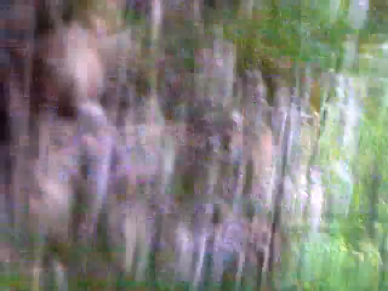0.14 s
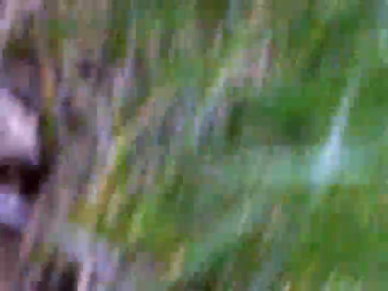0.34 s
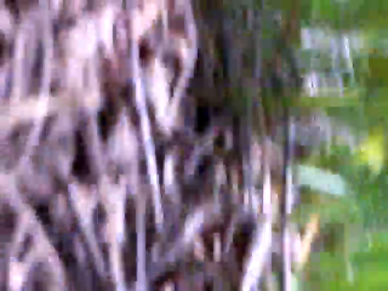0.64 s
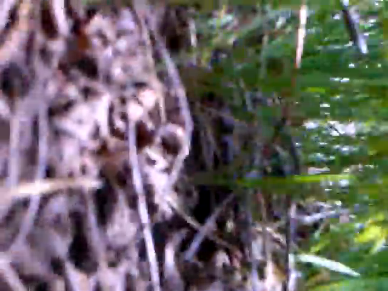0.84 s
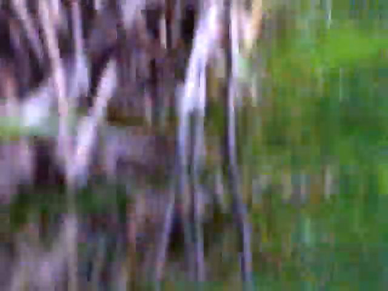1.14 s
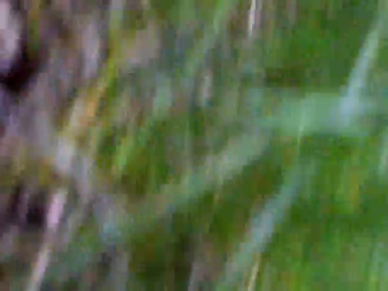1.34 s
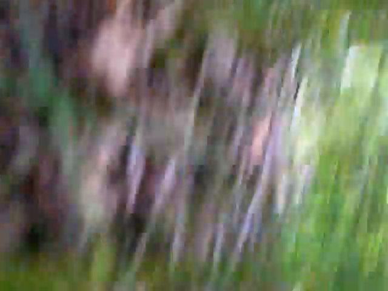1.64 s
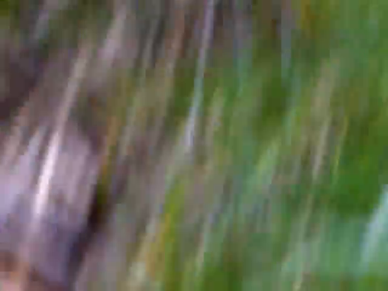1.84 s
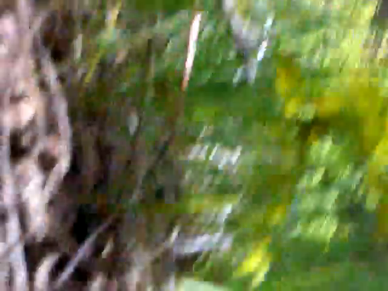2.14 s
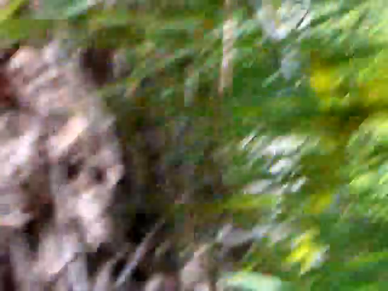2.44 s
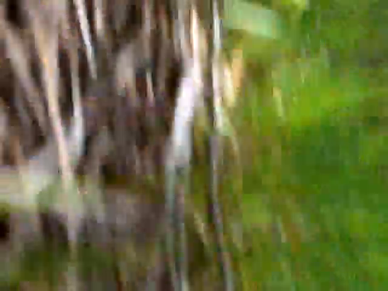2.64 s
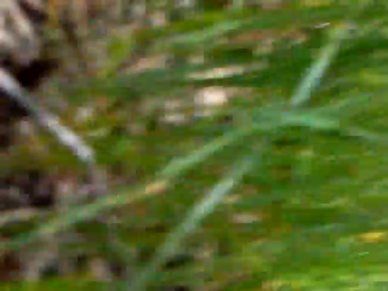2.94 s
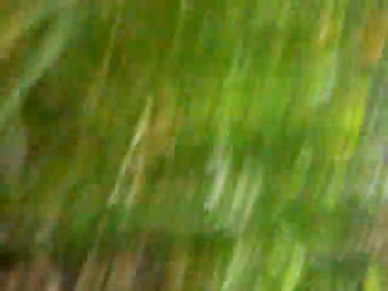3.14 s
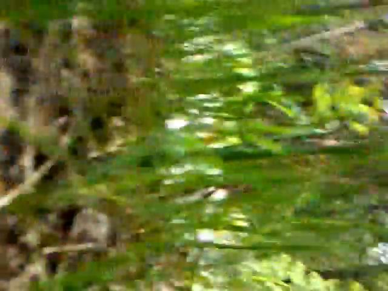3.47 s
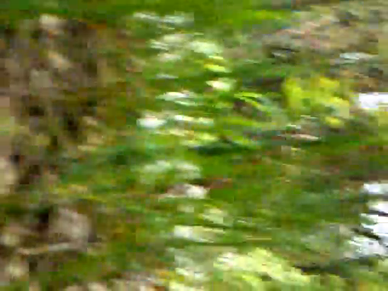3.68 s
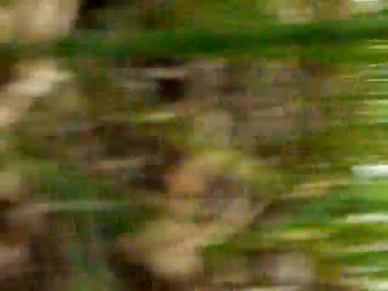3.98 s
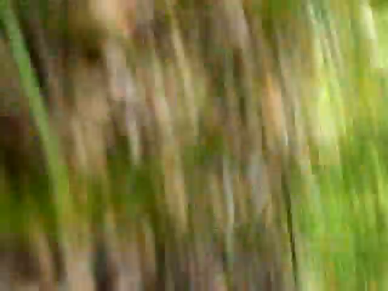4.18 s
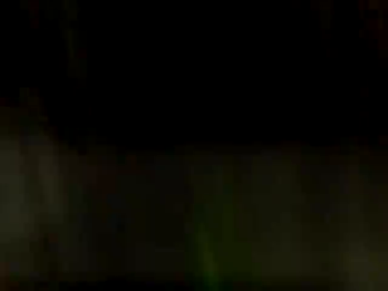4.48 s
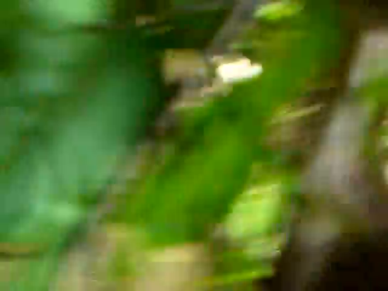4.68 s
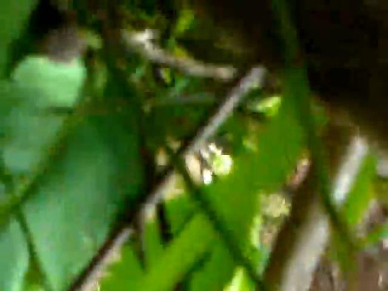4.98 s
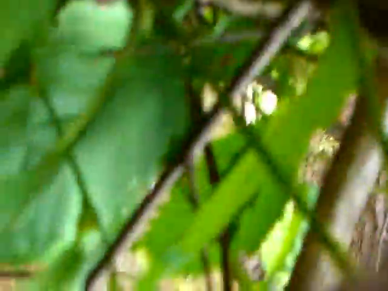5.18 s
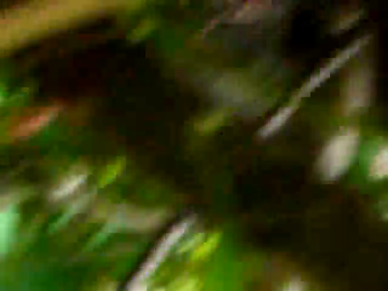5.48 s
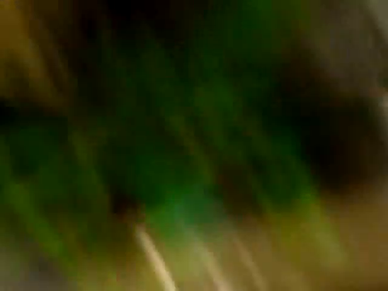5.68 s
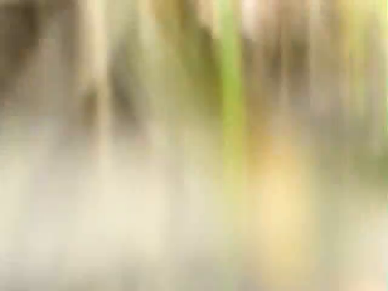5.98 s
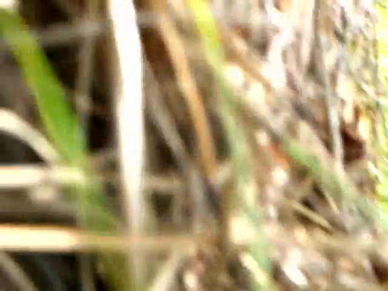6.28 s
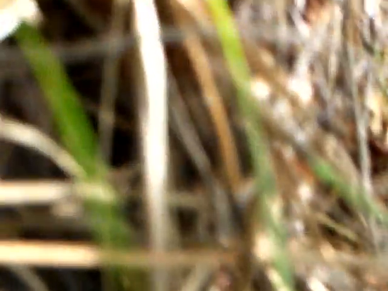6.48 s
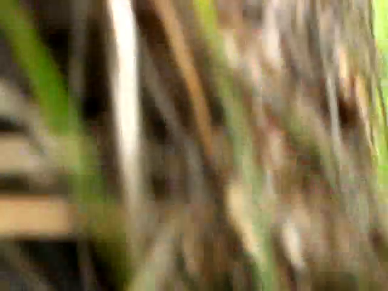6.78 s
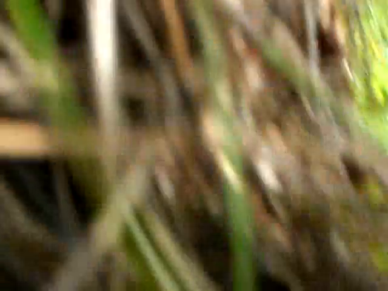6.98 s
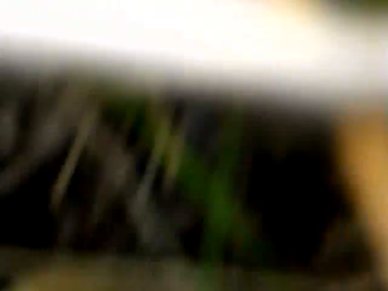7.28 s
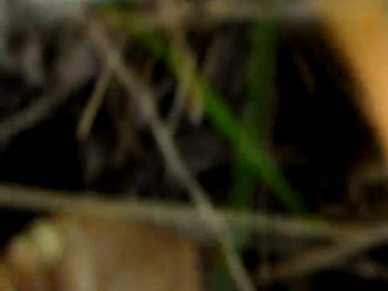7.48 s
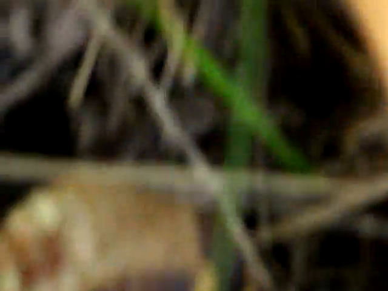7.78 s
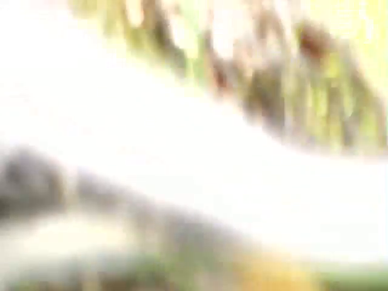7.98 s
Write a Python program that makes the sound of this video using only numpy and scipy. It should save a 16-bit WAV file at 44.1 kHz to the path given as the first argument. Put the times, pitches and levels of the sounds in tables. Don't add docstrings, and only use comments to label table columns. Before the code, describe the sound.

Outdoors, near the ground, a dense dry snake rattle runs without a break from start to end, like a fast maraca-like buzz. A small built-in microphone moves nearer and farther, shifting its brightness. A few plastic taps come first, then sharp clipped bumps after the middle, each pushing the rattle down for a moment before it swells back. The background is a soft, distant low wash.

```python
import sys
import numpy as np
from scipy import signal
from scipy.io import wavfile

SR = 44100
rng = np.random.default_rng(int(sys.argv[2]) if len(sys.argv) > 2 else 0)


def amplitude_ratio(level_db):
    exponent = np.asarray(level_db, float) / 20
    return 10 ** exponent


def to_wav(s):
    ch = np.atleast_2d(s).T
    pcm = np.round(np.clip(ch, -1, 1) * 32767)
    wavfile.write(sys.argv[1], SR, pcm.astype(np.int16))


N = 358091
T = np.arange(N) / SR

# (time [s], nearness [dB], turn to the tail's side [-1..1],
# grass shading the tail tip [dB], lower main shell resonance [Hz])
AIM = [(0.0, -22, -.4, -7.5, 6000), (.3, -20.5, -0.35, -11, 5970), (.7, -26, -0.69, -9.5, 5700),
       (1.15, -26.5, -0.61, -10, 5700), (1.65, -18.5, -0.1, -12, 5630), (2.2, -28.5, -.4, -13, 5420),
       (2.65, -23.5, 0.18, -12.5, 5450), (3.15, -20.5, 0.8, -10.5, 5770), (3.65, -20, 0.46, -9.5, 5550),
       (4.0, -20, -0.13, -10.5, 5960), (4.3, -20.5, 0.12, -7.5, 5570), (4.6, -22, 0.26, -6.5, 6100),
       (5.1, -24, 0.58, -5, 6060), (5.5, -21.5, 0.3, -8, 6000), (5.9, -19.5, -.95, -8.5, 5520),
       (6.4, -20.5, -0.28, -10, 5340), (7.2, -20.5, -0.14, -9.5, 5460), (8.12, -21, -.4, -6, 5580)]
MIDDLE_DB = -21.5
BEAT = [(1, 0.04, 0.14), (2, 0.34, 0.16), (3, 0.11, 0.062), (4, 0.48, 0.33), (6, 0.45, 0.04)]


def evened(x):
    return x / np.sqrt(np.mean(x ** 2) + 1e-20)


def curves(rows):
    s, *columns = np.transpose(rows)
    return [np.interp(T, s, c) for c in columns]


def coloured(x, points):
    f, db = np.transpose(points)
    log_hz = np.log(np.fft.rfftfreq(4096, 1 / SR) + 1)
    half = np.interp(log_hz, np.log(f + 1), db) * np.log(10) / 20
    whole = np.r_[half, half[-2:0:-1]]
    taps = np.fft.ifft(np.exp(np.conj(signal.hilbert(whole)))).real
    return signal.oaconvolve(x, taps[:2048])[:len(x)]


def resonate(x, hz, width):
    turn = np.exp(2j * np.pi * np.cumsum(hz * np.ones(len(x))) / SR)
    r = np.exp(-np.pi * width / SR)
    return 2 * (turn * signal.lfilter([1 - r], [1, -r], x / turn)).real


def wander(per_s):
    return evened(signal.lfilter([1], [1, -np.exp(-2 * np.pi * per_s / SR)], rng.standard_normal(N)))


def clacks(strength, per_s, spread_db):
    force = amplitude_ratio(spread_db * np.minimum(rng.exponential(1, N), 3))
    size = force * np.sign(rng.random(N) - .5)
    return evened(size * (rng.random(N) < per_s / SR)) * strength


def beat(turns, depths):
    swing = sum(d * np.cos(2 * np.pi * k * turns) for (k, *_), d in zip(BEAT, depths))
    return np.maximum(1 + swing, .05)


def rattle():
    # (time [s], tail shakes per second [Hz])
    shake = [(0.0, 62.6), (0.9, 62.7), (2.0, 59.7), (2.55, 61.1), (3.7, 57.8), (4.2, 58.1), (5.1, 62.2),
             (5.5, 60.1), (6.0, 60.6), (7.2, 57.8), (7.5, 59.6), (8.1, 59.7)]
    turns = np.cumsum(curves(shake)[0] * (1 + 0.03032 * wander(12.06))) / SR
    main_db, turn, shade_db, lower_hz = curves(AIM)

    ring_db = -25.5 - 0.23 * T - 1.6 * turn + 0.6 * (main_db - MIDDLE_DB)
    ring_hz = 2480 - 10.5 * T
    tip_db = main_db + shade_db
    low_db = main_db - 3.5 + 4 * turn
    lean_db = 0.95 - 3 * turn
    lower_db, upper_db = main_db + lean_db / 2, main_db - lean_db / 2
    shift_hz = lower_hz - 5700
    low_hz, upper_hz = 4580 + 0.036 * shift_hz, 7156 + 0.44 * shift_hz
    gap_db = 0.41 * ring_db + 0.42 * low_db - 8.5 - 1.9 * turn + 9 * shift_hz / 1000

    _, hollow_depths, shell_depths = np.transpose(BEAT)
    hollow = beat(turns - .12, hollow_depths)
    shell = beat(turns, shell_depths)
    shared = clacks(shell, 7500, 1.1)
    grip = amplitude_ratio(0.55 * wander(26))
    # (Hz, width Hz, dB, beat, share of common clacks)
    voices = [(ring_hz, 320, ring_db - 2.5, hollow, .3),
              (1900, 700, ring_db - 12.5, hollow, .3),
              (3250, 700, gap_db, shell, .4),
              (4130, 400, low_db - 8.5, shell, .55),
              (low_hz, 450, low_db - 4, shell, .55),
              (lower_hz, 420, lower_db - 6.5, shell, .55),
              (6250, 450, lower_db - 12.5, shell, .55),
              (upper_hz, 520, upper_db - 3.5, shell, .55),
              (7850, 800, upper_db - 6, shell, .55),
              (9080, 550, tip_db, shell, .55),
              (9900, 650, tip_db - 2.5, shell, .55),
              (1300, 900, ring_db - 21.5, hollow, .3),
              (10800, 1300, tip_db - 1, shell, .55)]
    out = np.zeros(N)
    for hz, width, db, strength, share in voices:
        drive = share * shared + np.sqrt(1 - share ** 2) * clacks(strength, 6500, 0.34)
        ring = resonate(resonate(drive, hz, 1.39 * width), hz, 4 * width)
        out += amplitude_ratio(db + 0.73 * wander(1.25)) * evened(ring)
    return grip * out


def knocks():
    # (time [s], peak level [dB], low mode [Hz], low mode against high [dB])
    flat_knocks = [(0.1701, -6, 690, -1.5), (1.6561, -4.5, 710, -2), (3.2474, -17.5, 545, 17),
                   (3.8112, 3, 454, -1.5), (3.8173, 1.5, 540, -1.5), (3.8546, -10.1, 473, 9),
                   (4.2593, -9, 460, -4.5), (4.292, -15, 495, 3), (4.4649, -14.5, 136, 8),
                   (4.5036, -20.1, 530, -8), (4.6135, -20.5, 649, 12), (5.4515, -21, 706, -1),
                   (5.8341, 3.5, 437, -12), (5.854, -11, 700, -18), (5.8739, -8, 865, -3),
                   (5.9619, -11, 700, 0), (6.0707, -16, 704, -9), (6.7558, 1, 516, -5),
                   (6.791, -15.5, 502, -2), (7.568, -17.5, 700, -9)]
    # (time [s], peak level [dB], low mode [Hz], low mode against high [dB])
    rim_knocks = [
        (2.45, -25, 280, 16),
        (2.614, -23, 557, 8),
        (3.55, -25, 500, 12),
        (4.396, -18, 503, 4.5),
        (4.485, -11.5, 1500, -3),
        (4.6844, 11.5, 920, -2),
        (4.7003, 3, 950, 5),
        (4.726, 3.5, 950, .1),
        (4.74, -6, 1050, 7),
    ]
    # (frequency [Hz], level [dB])
    case_path = [(40, -17), (130, 3), (300, 2), (3000, -2.6), (9000, -1.5), (11000, -21), (12500, -32)]
    rows = [(*k, 1420 + 11 * k[1], .015) for k in flat_knocks]
    rows += [(*k, 1850, .012) for k in rim_knocks]
    out, t = np.zeros(N), np.arange(2200) / SR
    noises = rng.standard_normal((len(rows), 2, len(t)))
    for (s, db, low_hz, low_db, high_hz, t60), noise in zip(rows, noises):
        low = amplitude_ratio(low_db - 60 * t / t60) * np.sin(2 * np.pi * low_hz * t) * (1 - np.exp(-t / .0008))
        modes = np.sin(2 * np.pi * high_hz * t) + .55 * np.sin(2 * np.pi * 2150 * t)
        high = amplitude_ratio(-60 * t / t60) * modes
        buzz = amplitude_ratio(-11 - 60 * t / t60) * evened(resonate(noise[0], 1700, 1400))
        crack = amplitude_ratio(-18 + 0.19 * db - 60 * t / 0.0076) * noise[1]
        body = amplitude_ratio(-21 - 60 * t / 0.038) * np.sin(2 * np.pi * 500 * t)
        landing = 1 - np.exp(-t / 0.00029)
        hit = (low + high + buzz + body) * landing + crack
        part = out[round(s * SR):][:len(t)]
        part += amplitude_ratio(db) * hit / abs(hit).max()
    return coloured(out, case_path)


def air():
    # (frequency [Hz], density [dB per Hz])
    wash_colour = [(12, -41), (20, -6), (85, -11), (269, 2), (482, 1), (529, 1.5), (582, -0.5), (931, -4.5),
                   (1210, -11.5), (1800, -10), (2340, 2), (3960, -120)]
    wash = coloured(rng.standard_normal(N), [*wash_colour, (2600, -30), (9000, -67)])
    level_db = -37 - 0.26 * T + 0.096 * (curves(AIM)[0] - MIDDLE_DB)
    return amplitude_ratio(level_db + 1.9 * wander(8.5)) * evened(wash)


def scene():
    # (frequency [Hz], level [dB])
    mic = [(100, 2), (600, -1), (1500, 3.5), (3200, -2.66), (6000, 2.3), (8500, -1.1), (10000, 0.4),
           (10800, -6.5), (11500, -11.5), (12100, -17.5), (12500, -36), (16000, -21)]
    return (coloured(rattle(), mic) + knocks() + air())[None]


def roll_off(x):
    return signal.sosfilt(signal.butter(12, 15900, fs=SR, output="sos"), x)


def record(dry):
    # (frequency [Hz], width [Hz])
    notches = [
        (4350, 130),
        (6589, 77),
        (8689, 200),
    ]
    # (time [s], cut [dB])
    overloads = [
        (3.8129, 11.5),
        (4.6854, 11),
        (4.7275, 7),
        (5.8334, 6),
        (6.757, 4),
    ]
    x = signal.oaconvolve(dry, signal.firwin(511, 12350, window=("kaiser", 12), fs=SR)[None], "same")
    for hz, width in notches:
        x = signal.lfilter(*signal.iirnotch(hz, hz / width, SR), x)
    cuts = [np.clip((T - s) / .0025, 0, 1) * (db - 27 * (T - s)) for s, db in overloads]
    cut_db = np.maximum(np.max(cuts, 0), 0)
    x = np.clip(x / amplitude_ratio(cut_db), -.73, .73)
    x = coloured(x[0], [(12300, 0), (12600, -7), (16000, -7)])[None]
    return roll_off(x)


dry = scene()
out = record(dry)
to_wav(out)
```